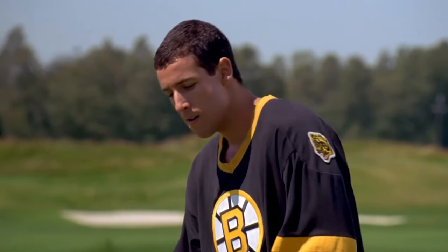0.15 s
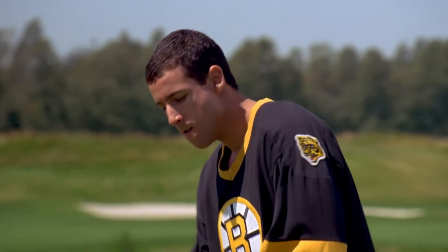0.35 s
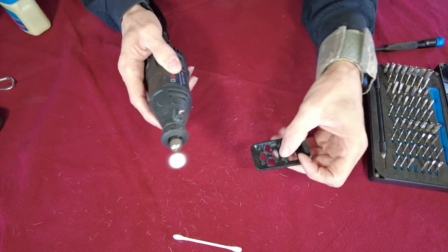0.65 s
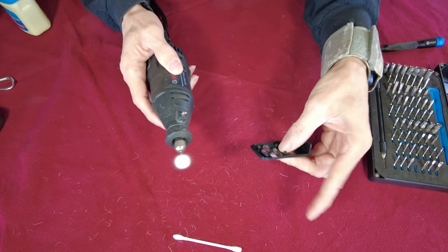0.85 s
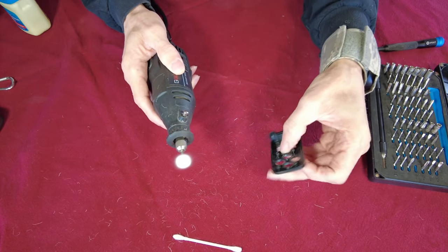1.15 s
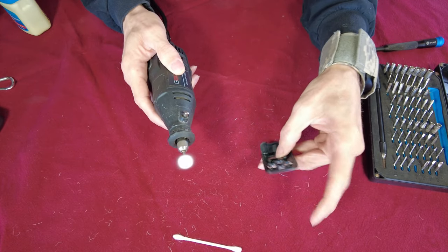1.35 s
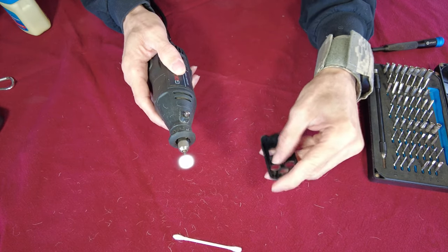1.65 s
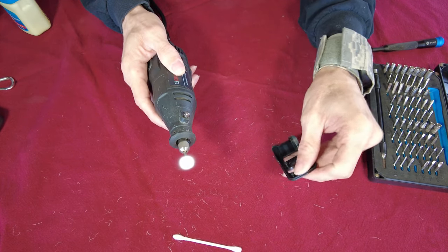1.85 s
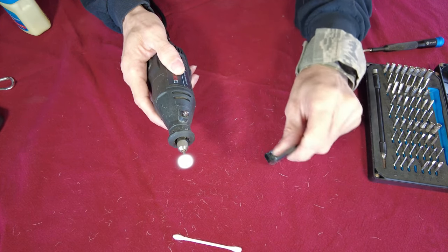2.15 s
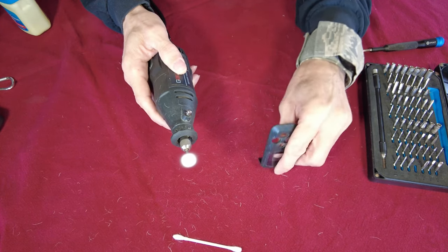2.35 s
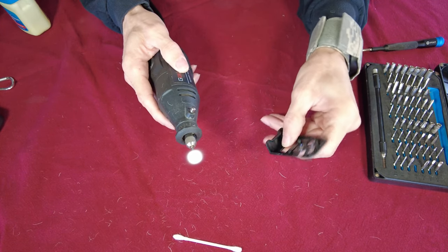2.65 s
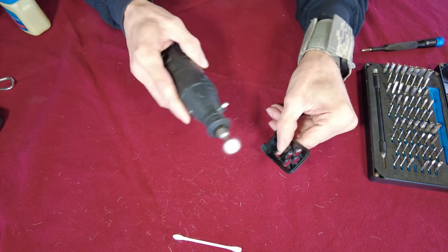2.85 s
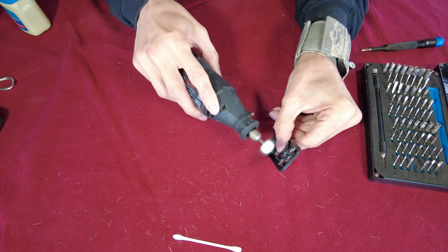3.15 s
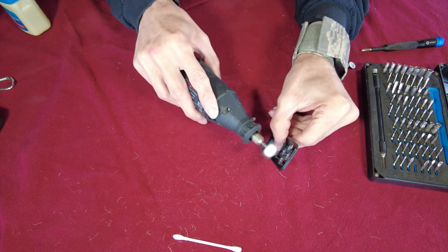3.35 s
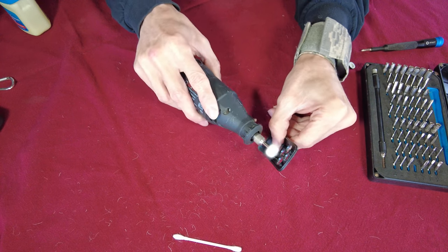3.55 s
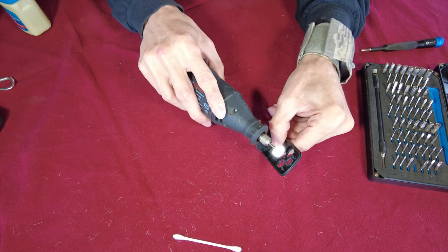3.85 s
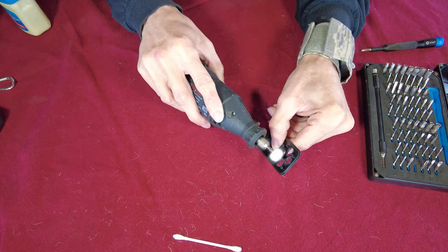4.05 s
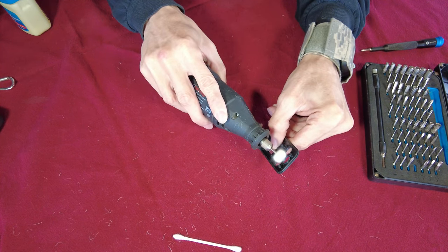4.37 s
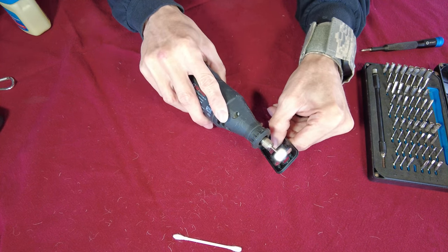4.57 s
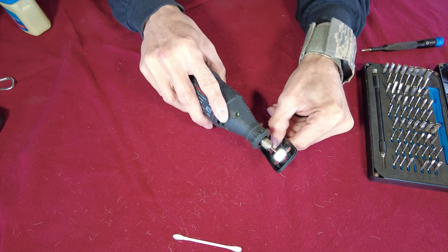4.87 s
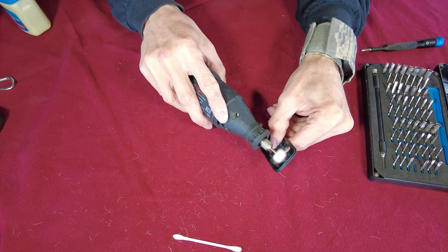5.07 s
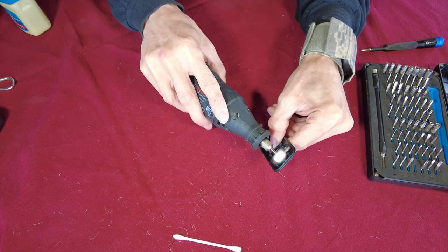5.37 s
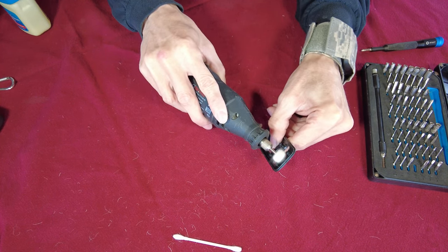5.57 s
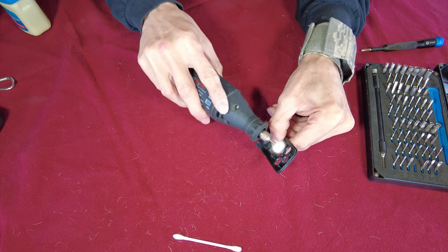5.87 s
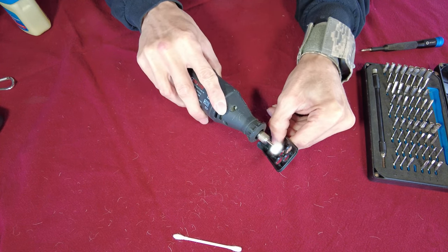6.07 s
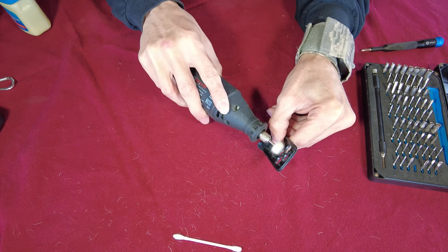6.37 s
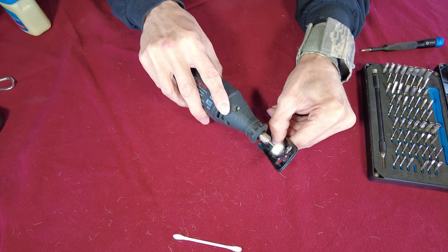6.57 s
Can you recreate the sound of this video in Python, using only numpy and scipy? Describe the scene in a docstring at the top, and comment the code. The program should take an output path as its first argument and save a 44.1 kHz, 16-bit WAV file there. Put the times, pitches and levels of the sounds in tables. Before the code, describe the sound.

Soft outdoor hush and distant chirps, then suddenly a loud, close high-speed motor whine with airy hiss, sagging in pitch as its felt wheel presses plastic.

```python
"""Open air with distant birds, then at once a workbench, where a small rotary tool runs at about 25000 rpm.
Outdoors: shaped noise for the breeze, a far low drone, gliding bird notes and small ticks, with some width.
At the bench, dead centre: tones locked to the shaft for imbalance, fan and commutator, slipping bearing tones,
armature slots fluttering with the mains, and a rush of cooling air, over the low rumble and hum of the room.
The hand turns the tool past the microphone and sets its felt wheel on a plastic part, which drags the speed down."""
import sys
import numpy as np
from scipy import signal
from scipy.fft import rfft, irfft
from scipy.io import wavfile

SR = 44100
rng = np.random.default_rng(int(sys.argv[2]) if len(sys.argv) > 2 else 0)


def store_wav(level_fs):
    """Save 16-bit WAV to argv[1]."""
    pcm = np.round(np.clip(np.atleast_2d(level_fs), -1, 1) * 32767)
    wavfile.write(sys.argv[1], SR, pcm.T.astype(np.int16))


N = 296352
TIME = np.arange(N) / SR
CUT_S = 0.6575  # open air gives way to the bench
EDGE_HZ = 15800  # upper band limit of the recorder
MAINS_HZ = 60
# the motor creeps up to its free speed: turns per s at first, turns per s when free, time constant in s
FIRST_SPEED, FREE_SPEED, SETTLE_S = 414.8, 425.4, .5

# Noise spectra give relative levels only; each noise is brought to unit rms before its own level is set.
# open air, centre of the image: [f/Hz, level/dB per Hz]
FIELD_CENTRE = [(12, -45), (20, -17), (54, -1.5), (75, -7), (107, -16), (140, -5.5), (299, -15), (324, -17),
                (402, -14.5), (857, -22.5), (1430, -24), (2670, -32), (3140, -32), (12600, -41.5),
                (13100, -70), (16600, -90), (22000, -120)]
# open air, side signal that gives it width: [f/Hz, level/dB per Hz]
FIELD_WIDTH = [(12, -34), (20, -9), (53, 2), (881, -18), (2670, -24), (3140, -20), (10000, -32),
               (12600, -42), (13100, -62), (16600, -80), (22000, -120)]
# distant bird notes: [t/s, length/s, start f/Hz, middle f/Hz, end f/Hz, level/dB]
BIRD_NOTES = [(.045, .07, 3950, 3200, 2950, -59), (.275, .025, 3850, 3900, 4000, -62),
              (.31, .045, 4250, 4380, 4330, -62), (.375, .045, 3750, 3300, 2950, -60),
              (.49, .07, 1900, 1750, 1600, -57)]
# small ticks and knocks outdoors: [t/s, centre f/Hz, width/Hz, length/s, level/dB]
OUTDOOR_TICKS = [(.096, 6300, 2500, .003, -50), (.14, 1500, 500, .01, -53), (.212, 6800, 2500, .003, -53),
                 (.386, 1400, 400, .005, -51.5), (.418, 6500, 6000, .002, -46),
                 (.432, 1020, 300, .007, -44.5), (.459, 1350, 400, .005, -52)]
# low background of the workroom: [f/Hz, level/dB per Hz]
ROOM_RUMBLE = [(12, 2), (25, 0.5), (50, -11), (76, 3.5), (93, 4), (110, -8), (160, -20.5), (205, -6.5),
               (230, -10.5), (400, -44)]
# hum of the workroom: [f/Hz, early level/dB, late level/dB]
ROOM_HUM = [(35.4, -58.5, -59.5), (120, -65, -57), (239.3, -60.5, -60.5)]
# the hand carries the tool over to the work: [start t/s, end t/s]
SWING_SPAN = (2.808, 3.25)
# the hand brings the wheel against the edge of the plastic: [start t/s, end t/s]
TOUCH_SPAN = (3, 3.68)
# the hand slides the wheel from the edge onto the face: [start t/s, end t/s]
SEAT_SPAN = (3.4, 4.15)
# the hand leans on the wheel: [start t/s, end t/s]
PRESS_SPAN = (5.5, 5.97)
# drag of the felt wheel on the plastic: [t/s, speed lost/turns per s]
WHEEL_DRAG = [(2.6, 0), (3.1, .55), (3.45, 2.4), (4.0, 3.1), (4.6, 4.2), (5.49, 7.3), (5.62, 13.8),
              (5.85, 12), (6.72, 10.3)]
# air in the housing, tool held free: [f/Hz, level/dB per Hz]
FREE_ROAR = [(170, -20), (330, -19), (480, -15), (640, -4), (800, -1), (1080, 2), (1250, -2), (1370, -9.5),
             (1600, -2.5), (1950, -4), (2250, -6), (2500, -3), (2750, -9), (4200, -16)]
# air in the housing, tool at the work: [f/Hz, level/dB per Hz]
WORK_ROAR = [(170, -42), (330, -20), (480, -17.5), (640, -4), (800, -1), (1180, 2), (1400, -2), (1680, 3.5),
             (1890, 0), (2050, -8.5), (2600, -8), (3050, -15.5), (3400, -15.5), (4200, -16.5)]
# hiss of the vents: [f/Hz, level/dB per Hz]
VENT_HISS = [(2500, -16), (3600, -9.5), (4300, -13), (5100, -4.5), (5800, -4), (6400, -1), (7100, 2),
             (7700, -2), (8200, -10), (9500, -30)]
# fizz of the brushes: [f/Hz, level/dB per Hz]
BRUSH_FIZZ = [(6500, -10), (8200, 1), (9200, 3), (10000, 2), (11000, 3.5), (12800, 0), (13600, -3),
              (14600, -13), (16000, -13)]
# felt grazing the edge of the plastic: [f/Hz, level/dB per Hz]
FELT_GRAZE = [(2500, -5), (3900, -18), (4800, -8), (5600, -12), (6300, -6), (7150, 2.5), (8000, -6),
              (8700, -13.5), (9200, -6), (9900, -15), (11000, -18), (12200, -14), (13300, -25),
              (15000, -30)]
# ball bearing tones, before a common trim: [multiple of the speed, free level/dB, work level/dB]
BALL_TONES = [(1.82, -53, -51), (2.57, -47, -50), (3.43, -44.5, -45), (4.43, -50.5, -40.5),
              (4.57, -49, -50.5), (5.18, -51, -50.5), (5.43, -57.5, -56), (15.72, -57, -49)]
# armature slot tone and its mains sidebands, before a common trim: [sideband number, free level/dB, work level/dB]
SLOT_SIDEBANDS = [(-3, -68, -55), (-2, -50, -45), (-1, -46.5, -40), (0, -41.5, -41.5), (1, -44, -54.5),
                  (2, -46, -67), (3, -48.5, -65), (4, -71, -70)]
# slot tones flaring or fading: [centre t/s, length/s, sideband number, gain/dB]
SLOT_BEAMS = [(.85, .6, -1, 9), (.9, .6, -2, 8), (2.3, 1.1, 1, 7), (2.97, .35, 0, 8), (3.1, .25, 3, 11),
              (3.75, .7, 0, -15), (3.8, .7, -1, -4), (5.25, .6, 1, 8)]
# buzz of the hard-pressed wheel: [multiple of the speed, level/dB]
PRESSED_BUZZ = [(26, -50), (27, -50), (28, -49), (29, -58), (30, -57), (33, -65)]
# shaft tones, before a common trim: [multiple of the speed, free level/dB, work level/dB]
SHAFT_ORDERS = [(1, -43.5, -38), (2, -32.5, -32), (3, -49.5, -51), (4, -43, -37.5), (5, -49.5, -47),
                (6, -40, -49), (7, -54, -49), (12, -53.5, -56), (13, -54, -68), (15, -41, -40),
                (16, -45, -41.5), (17, -48.5, -46), (18, -42.5, -45), (19, -56, -54), (25, -55, -59),
                (29, -53, -57), (30, -58, -57), (31, -48, -45), (33, -64, -65)]
# shaft tones flaring or fading as the tool turns in the hand: [centre t/s, length/s, multiple of the speed, gain/dB]
SHAFT_BEAMS = [(.8, .9, 18, 4), (.85, 1.0, 33, 18), (.9, .6, 31, 3), (1.9, .8, 15, 2), (1.7, .8, 31, -9),
               (1.75, .7, 18, -8), (2.3, .6, 17, 4), (2.85, .4, 18, 5), (2.95, .3, 15, -9),
               (2.97, .25, 13, 11), (3.05, .35, 2, 3), (3.42, .5, 16, 3), (3.7, .7, 18, 5),
               (3.85, .6, 29, 12), (5.65, .35, 15, 3), (5.7, .35, 16, 3), (6.3, .8, 17, 5),
               (6.45, .9, 31, -6), (6.5, .5, 4, 3)]


def gain_of(db):
    """Decibels to amplitude."""
    return 10 ** (np.asarray(db) / 20)


def evened(x):
    """Scales to an rms of one."""
    return x / np.sqrt(np.mean(x ** 2) + 1e-20)


def drift(hz):
    """Random wander of unit rms, rolling off steeply above hz."""
    f = np.fft.rfftfreq(N, 1 / SR)
    lowpass = 1 / (1 + (f / hz) ** 4)
    return evened(irfft(rfft(rng.standard_normal(N)) * lowpass, N))


def noise(spectrum):
    """Noise of unit rms with the given spectrum, falling away beyond both ends of the table."""
    f = np.fft.rfftfreq(N, 1 / SR)
    hz, db = np.transpose(spectrum)
    upper_skirt = 1 / np.maximum(f / hz[-1], 1) ** 4
    lower_skirt = np.minimum(f / hz[0], 1) ** 2
    shape = gain_of(np.interp(np.log(f + 1), np.log(hz), db)) * upper_skirt * lower_skirt
    return evened(irfft(rfft(rng.standard_normal(N)) * shape, N))


def tone(turns, db):
    """A sine of the given rms level, from its running count of cycles and a random starting phase."""
    return np.sqrt(2) * gain_of(db) * np.sin(2 * np.pi * (turns + rng.random()))


def breeze(field_db=-45, rustle_db=1.3):
    """Moving air, heard as low-weighted noise whose level rustles."""
    return gain_of(field_db + rustle_db * drift(30)) * noise(FIELD_CENTRE)


def far_drone(drone_hz=140.8, drone_db=-49):
    """A far low drone: one steady tone that comes up to full level early on."""
    return tone(drone_hz * TIME, drone_db) * np.interp(TIME, [.25, .45], [.4, 1])


def birds(blur_turns=.12, flutter_db=2):
    """Each note glides along a parabola in pitch; distance blurs its phase and flutters its level."""
    out = np.zeros(N)
    for start, length, *glide, db in BIRD_NOTES:
        u = np.clip((TIME - start) / length, 0, 1)
        hz = np.polyval(np.polyfit([0, .5, 1], glide, 2), u)
        turns = np.cumsum(hz) / SR + blur_turns * drift(150)
        swell = np.sqrt(4 * u * (1 - u))
        out += tone(turns, db + flutter_db * drift(80)) * swell
    return out


def ticks():
    """Small knocks: narrow bands of noise that rise quickly and die away."""
    out = np.zeros(N)
    for start, hz, width, length, db in OUTDOOR_TICKS:
        u = np.maximum(TIME - start, 0) / length * 2
        out += tone(hz * TIME, db) * drift(width / 2) * u * np.exp(1 - u)
    return out


def outdoors():
    """The open air in the centre of the image: breeze, drone, birds and ticks add up."""
    return breeze() + far_drone() + birds() + ticks()


def workroom(room_db=-51, waver_db=1.3):
    """Low rumble around the bench, as noise, and a few hum tones of slowly wavering level."""
    out = gain_of(room_db) * noise(ROOM_RUMBLE)
    for hz, *levels in ROOM_HUM:
        out += tone(hz * TIME, np.interp(TIME, [3.4, 4], levels) + waver_db * drift(1.0))
    return out


def move(start, end):
    """A smooth move of the hand, from 0 before it to 1 after it."""
    u = np.clip((TIME - start) / (end - start), 0, 1)
    return np.sin(np.pi / 2 * u) ** 2


def aimed(free_db, work_db):
    """A level that changes as the tool swings over to the work."""
    return free_db + (work_db - free_db) * move(*SWING_SPAN)


def swinging():
    """1 in the middle of the swing, 0 before and after it."""
    return np.sin(np.pi * move(*SWING_SPAN))


def grazing():
    """Rises to 1 as the wheel touches the edge of the plastic, back to 0 as it seats on the face."""
    return move(*TOUCH_SPAN) * (1 - move(*SEAT_SPAN))


def flare(rows, number):
    """Decibels that one tone gains as its beam sweeps past the microphone."""
    return sum(db * np.exp(-(2 * (TIME - s) / length) ** 2) for s, length, k, db in rows if k == number)


def shaded(sound, amount, corner_hz=3000):
    """Dulls a sound by an amount from 0 to 1, as a finger in front of it does."""
    dull = signal.sosfiltfilt(signal.butter(2, corner_hz, fs=SR, output="sos"), sound)
    return sound + amount * (dull - sound)


def shaft(tremble_hz=0.048, swing_hz=0.31):
    """Turns of the shaft so far: it settles to its free speed, sags under drag, and trembles most during the swing."""
    settling = (FREE_SPEED - FIRST_SPEED) * np.exp(-(TIME - CUT_S) / SETTLE_S)
    drag = np.interp(TIME, *np.transpose(WHEEL_DRAG))
    tremble = (tremble_hz + swing_hz * swinging()) * drift(8.6)
    return np.cumsum(FREE_SPEED - settling - drag + tremble) / SR


def air_body(edge, free_db=-29.5, work_db=-27.2, swing_db=1.1):
    """Air roars through the housing, swells as it swings past, and is shaded while the wheel grazes the edge."""
    at_work = move(*SWING_SPAN)
    free = np.sqrt(1 - at_work) * gain_of(free_db) * noise(FREE_ROAR)
    work = np.sqrt(at_work) * gain_of(work_db) * noise(WORK_ROAR)
    return gain_of(swing_db * swinging()) * shaded(free + work, edge)


def air_treble(edge, graze_db=-30.5, flicker_db=1.0):
    """Vents hiss and brushes fizz, giving way to the felt while it grazes the edge; the treble flickers."""
    hiss = gain_of(aimed(-33.5, -34.0)) * noise(VENT_HISS)
    fizz = gain_of(aimed(-40, -39.0)) * noise(BRUSH_FIZZ)
    felt = gain_of(graze_db) * noise(FELT_GRAZE)
    treble = np.sqrt(1 - edge) * (hiss + fizz) + np.sqrt(edge) * felt
    return gain_of(flicker_db * drift(280)) * treble


def air(turns, chop=0.18):
    """The whole rush of air, chopped twice a turn."""
    edge = grazing()
    pulsing = evened(1 + chop * np.cos(2 * np.pi * 2 * turns))
    rush = pulsing * (air_body(edge) + air_treble(edge))
    # a small housing radiates no bass
    return signal.sosfilt(signal.butter(2, 260, "highpass", fs=SR, output="sos"), rush)


def bearings(turns, slip_turns=0.084, trim_db=-0.5, waver_db=3.0):
    """The balls slip a little, so their tones are blurred and lie between the shaft orders."""
    out = np.zeros(N)
    for ratio, *levels in BALL_TONES:
        level = aimed(*levels) + trim_db + waver_db * drift(1.1)
        out += tone(ratio * turns + slip_turns * drift(19), level)
    return out


def armature(turns, order=8, trim_db=-1.8, waver_db=0.94):
    """The slots sing in bursts, one for each half wave of the mains."""
    out = np.zeros(N)
    for side, *levels in SLOT_SIDEBANDS:
        phase = order * turns + side * 2 * MAINS_HZ * TIME  # phases stay aligned, so the sidebands form bursts
        out += gain_of(aimed(*levels) + flare(SLOT_BEAMS, side)) * np.cos(2 * np.pi * phase)
    return np.sqrt(2) * gain_of(trim_db + waver_db * drift(12.0)) * out


def buzz(turns, waver_db=2.5):
    """Pressed hard, the wheel adds a cluster of high shaft tones."""
    cluster = sum(tone(order * turns, db + waver_db * drift(10.0)) for order, db in PRESSED_BUZZ)
    return move(*PRESS_SPAN) ** 2 * cluster


def whine(turns, trim_db=-0.3, waver_db=1.0, wander_db=1.1):
    """Imbalance, fan blades and commutator repeat with every turn; the higher tones waver in the unsteady hand."""
    out = np.zeros(N)
    for order, *levels in SHAFT_ORDERS:
        unsteady = min(order / 4, 1) ** 2
        sway = unsteady * (waver_db * drift(16) + wander_db * drift(2.6))
        out += tone(order * turns, trim_db + aimed(*levels) + flare(SHAFT_BEAMS, order) + sway)
    return out


def scene(width_db=-53):
    """Open air, which has some width, gives way at once to the running tool, dead centre."""
    turns = shaft()
    bench = workroom() + air(turns) + bearings(turns) + armature(turns) + buzz(turns) + whine(turns)
    indoors = np.clip((TIME - CUT_S) / .001, 0, 1)
    middle = (1 - indoors) * outdoors() + indoors * bench
    side = (1 - indoors) * gain_of(width_db) * noise(FIELD_WIDTH)
    return np.array([middle + side, middle - side])


def record(dry):
    """The band limit of the recorder: a steep lowpass on both channels."""
    lowpass = signal.firwin(511, EDGE_HZ, window=("kaiser", 9), fs=SR)
    return signal.oaconvolve(dry, lowpass[None], "same")


dry = scene()
out = record(dry)
store_wav(out)
```